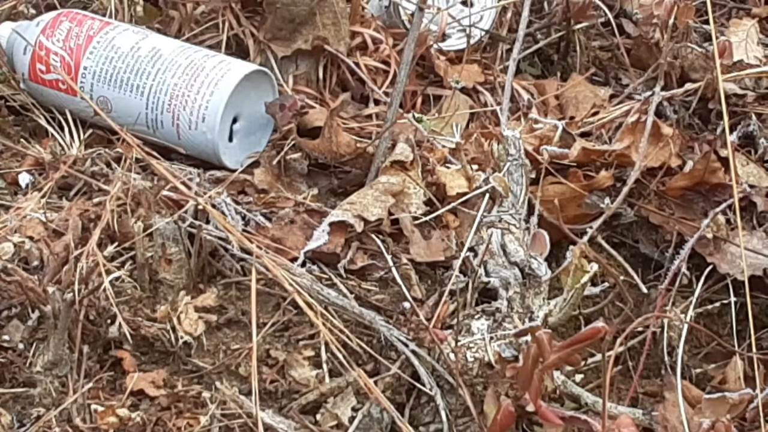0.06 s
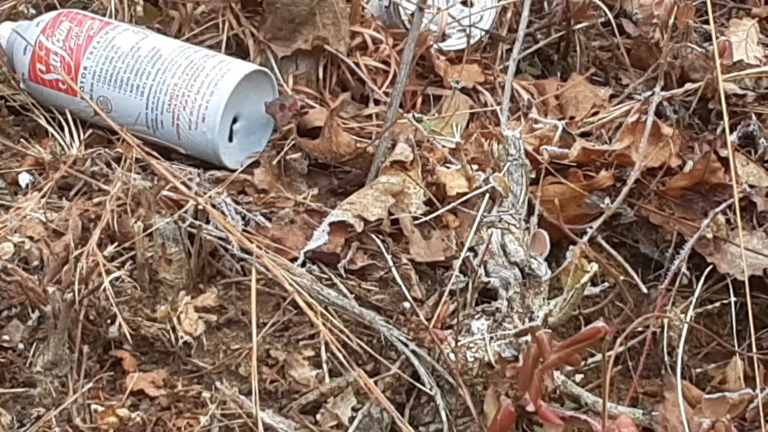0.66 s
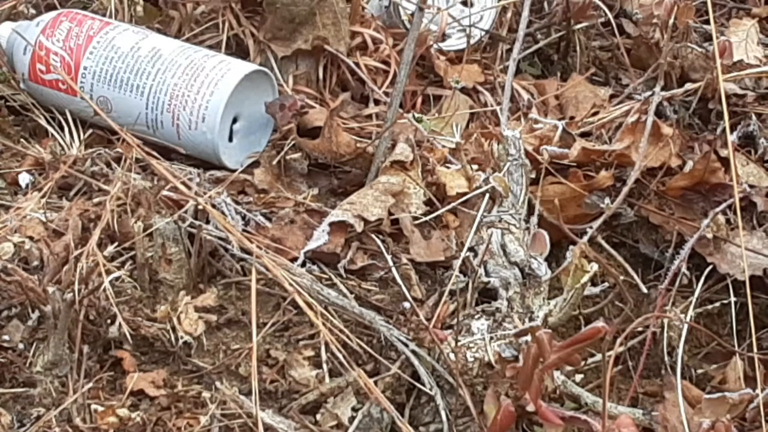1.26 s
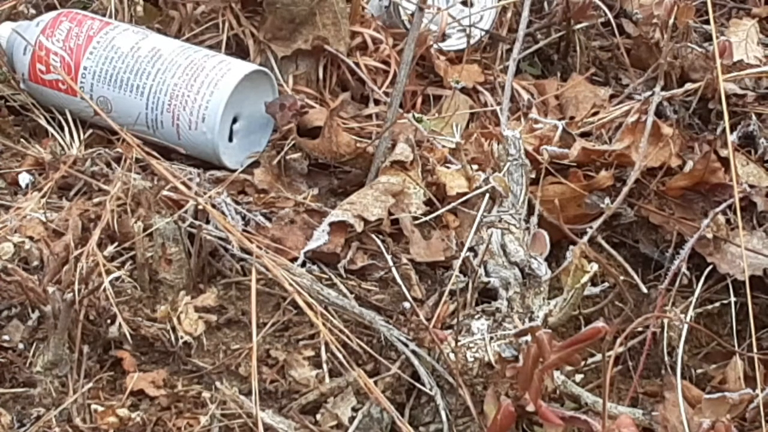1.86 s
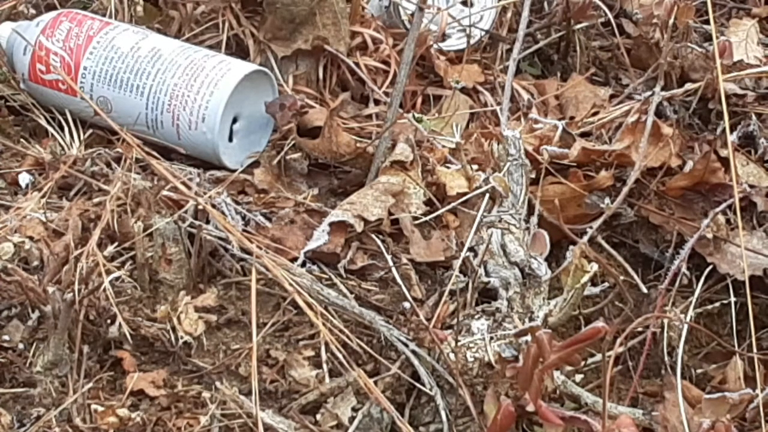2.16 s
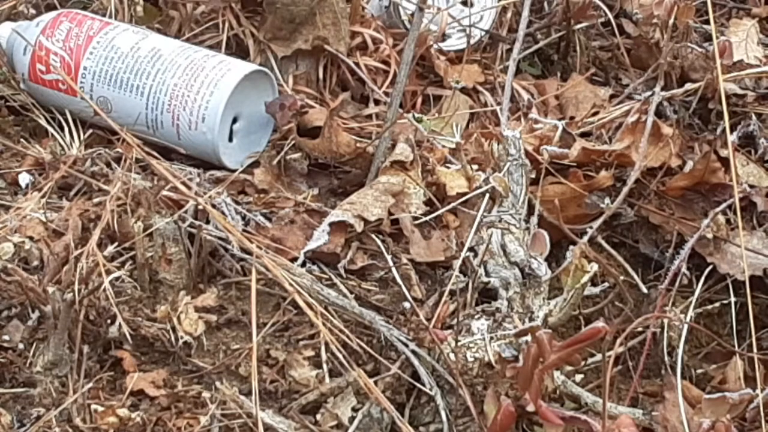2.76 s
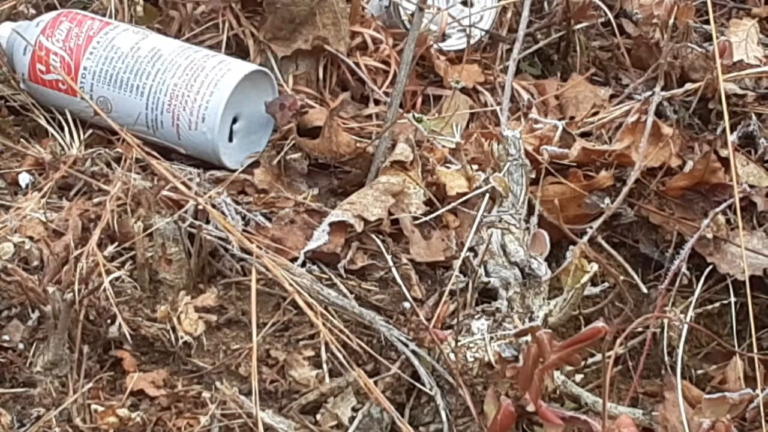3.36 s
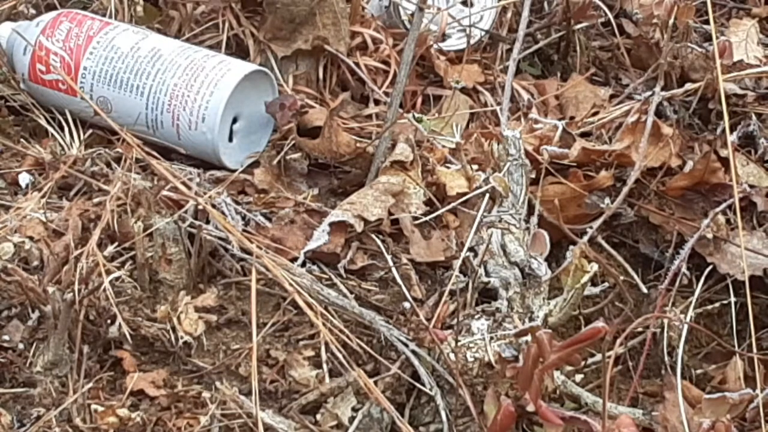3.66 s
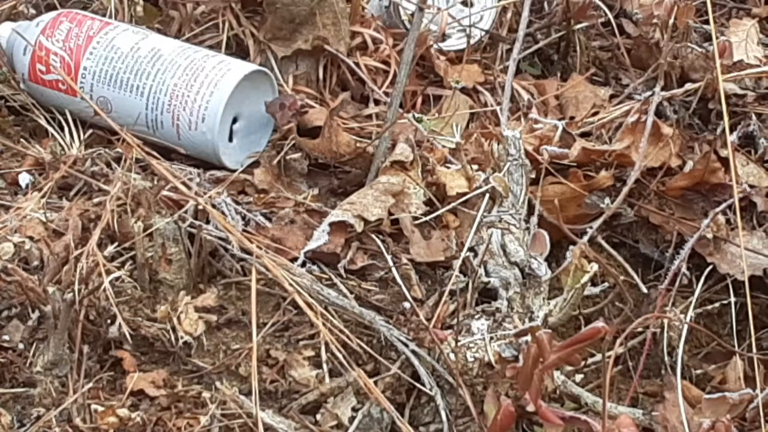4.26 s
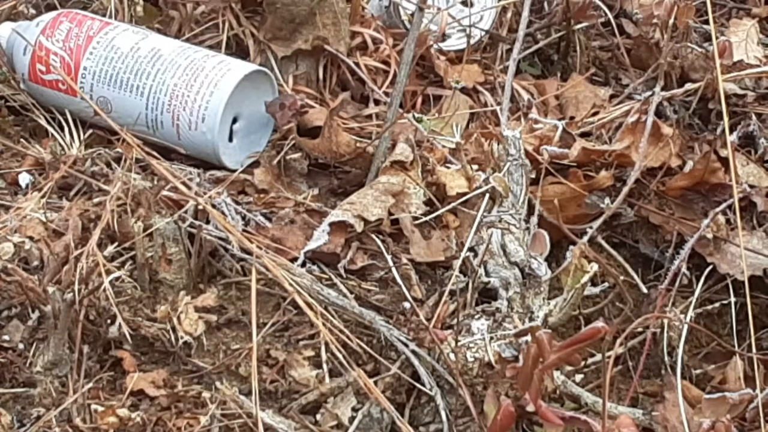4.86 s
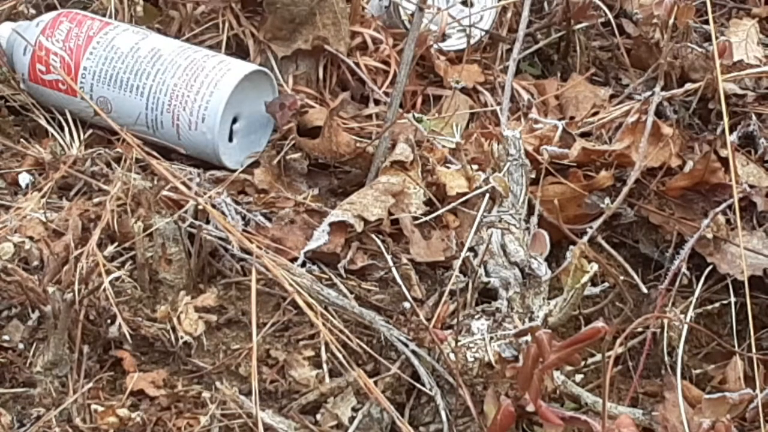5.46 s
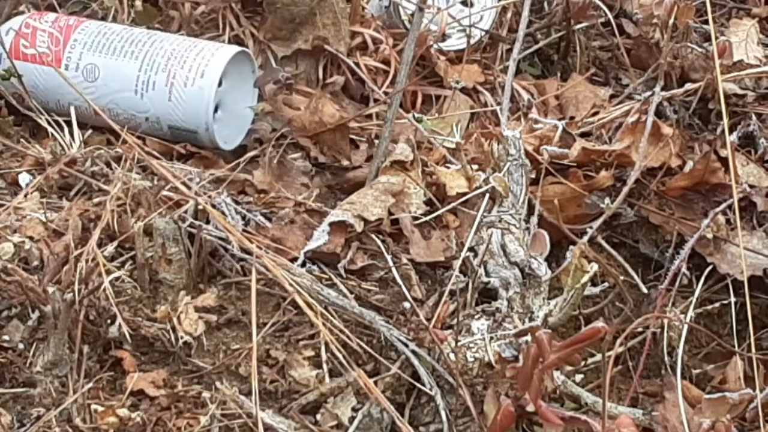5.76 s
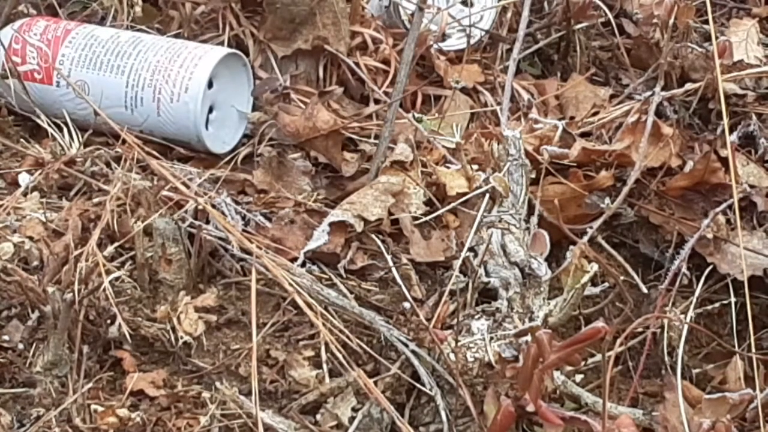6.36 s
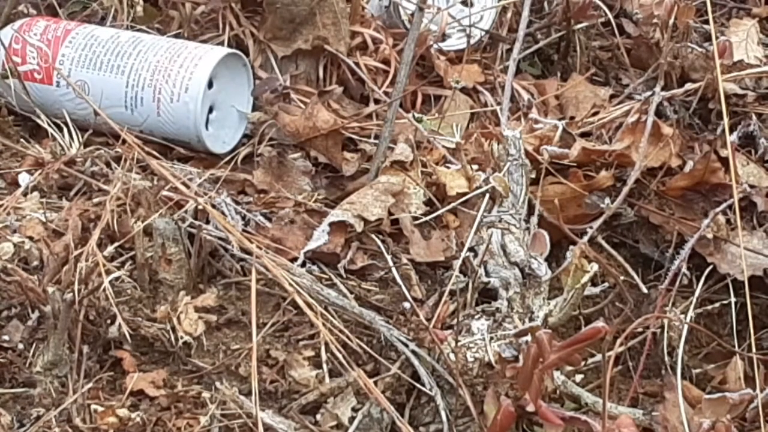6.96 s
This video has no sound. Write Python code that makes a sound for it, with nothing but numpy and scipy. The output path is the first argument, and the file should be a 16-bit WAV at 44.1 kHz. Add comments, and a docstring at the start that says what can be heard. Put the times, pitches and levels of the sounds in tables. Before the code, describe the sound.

In quiet woodland, an air rifle is readied with a few small clicks, a metal scrape and a hollow knock. Leaves shuffle softly, a dull boom rolls in from far away, and a small bird sings faintly on the left. Then the rifle cracks sharply and the pellet punches an empty can near the microphone. The can rings and rattles briefly, the trees echo the shot, and distant birds chirp.

```python
"""In quiet woodland, an air rifle is fired at an empty can lying in dry leaves near the microphone.
The rifle clicks and scrapes as it is readied, leaves shuffle, something thumps far off and birds sing.
Then the spring lets go, the muzzle cracks, and the pellet punches the can, whose thin wall rings.
The trees echo the shot, and the loud peak turns the recorder's volume down for over a second."""
import sys
import numpy as np
from scipy import signal
from scipy.fft import rfft, irfft, next_fast_len
from scipy.io import wavfile
from scipy.ndimage import minimum_filter1d

SR = 44100
rng = np.random.default_rng(int(sys.argv[2]) if len(sys.argv) > 2 else 0)


def transcribe(signal):
    """Save signal, clipped to [-1, 1], as a 16-bit WAV file at the path in sys.argv[1]."""
    frames = np.atleast_2d(signal).T
    limited = np.clip(frames, -1, 1)
    pcm = np.round(limited * 32767).astype(np.int16)
    wavfile.write(sys.argv[1], SR, pcm)


N = 318402
TIME = np.arange(N) / SR
STRIKE_S = 5.6405   # the pellet hits the can


def from_db(db):
    """Turn decibels into a number to multiply a sound by."""
    return 10 ** (np.asarray(db) / 20)


def rms_one(x):
    """Scale a sound so that its average power is one."""
    return x / np.sqrt(np.mean(x ** 2) + 1e-20)


def pan(db):
    """Left and right gains that make the left side louder by db."""
    return from_db([[db / 2], [-db / 2]])


def add(out, start, sound):
    """Mix a sound into out, beginning at start seconds."""
    i = round(start * SR)
    out[:, i:i + sound.shape[-1]] += sound[..., :N - i]


def noise(spectrum, size, alike_hz=480, lag_s=.0004):
    """Stereo noise shaped by (pitch [Hz], level [dB]) rows; the two sides are alike only in the bass."""
    f = np.fft.rfftfreq(size, 1 / SR) + 1e-3
    hz, db = np.transpose(spectrum)
    octaves_outside = np.maximum(np.log2(hz[0] / f), 0) + np.maximum(np.log2(f / hz[-1]), 0)
    gain = from_db(np.interp(np.log(f), np.log(hz), db) - 24 * octaves_outside)
    right, left_only = rfft(rng.standard_normal((2, size)))
    alike = 1 / (1 + (f / alike_hz) ** 2)
    left = np.sqrt(alike) * right * np.exp(-2j * np.pi * f * lag_s) + np.sqrt(1 - alike) * left_only
    return rms_one(irfft(gain * np.array([left, right]), size))


def burst(bands, rise_s):
    """Bands of noise start together; each drops about 60 dB in its own fade time."""
    t = TIME[:2 ** 16]
    centres = [bands[0][0] / 2] + [band[0] for band in bands] + [bands[-1][0] * 1.2]
    out = 0
    for low, (hz, db, fade_s, pan_db), high in zip(centres, bands, centres[2:]):
        shape = [(low, -20), (np.sqrt(low * hz), -3), (hz, 0), (np.sqrt(hz * high), -3), (high, -20)]
        out = out + pan(pan_db) * noise(shape, len(t)) * from_db(db) * .00089 ** (t / fade_s)
    return out * (1 - np.exp(-t / rise_s))


def woods(sound, fade_s, rise_s=.012):
    """Countless faint echoes of a sound bounce back from trunks and leaves."""
    t = TIME[:SR]
    echoes = rng.standard_normal((2, SR)) * .0016 ** (t / fade_s) * (1 - np.exp(-t / rise_s))
    return signal.fftconvolve(np.atleast_2d(sound), rms_one(echoes) / np.sqrt(SR), axes=-1)


def note(hz, taper):
    """A pure tone follows the pitches in hz; taper is the share of it spent fading in and out."""
    return np.sqrt(2) * np.sin(2 * np.pi * np.cumsum(hz) / SR) * signal.windows.tukey(len(hz), taper)


def waver(size, per_s):
    """A wobble that glides to a new random value per_s times a second."""
    targets = rng.standard_normal(SR // 10)
    return np.interp(TIME[:size] * per_s, np.arange(len(targets)), targets)


def background():
    """A distant rumble, a light breeze and a faint, even hiss."""
    # tone of the outdoor air: (pitch [Hz], relative level [dB])
    air_tone = [(15, -54), (25, -26.5), (50, -7), (75, -2), (178, -5), (215, -11.5), (359, -23.5),
                (848, -39), (3340, -44.5), (3930, -42), (5880, -46.5), (7500, -48), (9300, -55.5),
                (12200, -36), (15500, -39.5)]
    # the rumble sinks and comes back: (time [s], level [dB])
    rumble_levels = [(0, -57.5), (2.2, -58), (5.2, -62), (7.2, -57.5)]
    air = from_db(-58.5) * noise(air_tone, next_fast_len(N))[:, :N]
    low = signal.sosfiltfilt(signal.butter(2, 450, fs=SR, output="sos"), air)
    hiss = signal.sosfiltfilt(signal.butter(2, 8000, "high", fs=SR, output="sos"), air)
    breeze = air - low - hiss
    rumble = from_db(np.interp(TIME, *np.transpose(rumble_levels))) * rms_one(low)
    return pan(3.5) * (rumble + from_db(4.3) * breeze) + pan(-.4) * from_db(2) * hiss


def clicks(snap_fade_s=.026, knock_fade_s=.035):
    """Rifle parts and twigs click: each makes a bright snap and a duller knock, which the trees echo."""
    # the clicks: (time [s], snap level [dB], knock level [dB])
    events = [(.105, -57, -57), (.128, -57, -54), (.187, -55, -47), (.242, -47, -48), (.322, -34, -49),
              (.679, -75, -57), (.816, -75, -57), (.854, -69, -60), (1.088, -61, -52), (6.097, -49, -72)]
    # tone of the snap and of the knock: (pitch [Hz], relative level [dB])
    snap_tone = [(1500, -15), (3000, -11), (4800, 0), (6300, -9), (7800, 0), (10000, -18.5), (15000, -12)]
    knock_tone = [(150, -14), (330, -5.5), (460, 6.5), (600, -4), (760, 2), (1000, -15), (1500, -12.5),
                  (2050, -5), (2400, -11.5), (2900, -6), (3700, -23), (6000, -26)]
    out, t = np.zeros((2, N)), TIME[:SR // 5]
    for start, snap_db, knock_db in events:
        snap = from_db(snap_db - 60 * t / snap_fade_s) * pan(-3) * noise(snap_tone, len(t))
        knock = from_db(knock_db - 60 * t / knock_fade_s) * pan(1) * noise(knock_tone, len(t))
        click = (snap + knock) * (1 - np.exp(-t / .00047))
        add(out, start, click)
        add(out, start, from_db(-8) * woods(click, fade_s=.37))
    return out


def slide(start_s=.11, length_s=.2, rough_db=4, damping=3, fade_db_per_s=35):
    """The rifle's metal parts slide: uneven rubbing makes them ring, and the hand muffles them."""
    # tones of the parts before muffling: (pitch [Hz], width [Hz], relative level [dB])
    metal_tones = [(684, 28, 0), (1970, 110, -6), (2930, 64, -1), (4860, 37, -4), (5330, 150, -4),
                   (7360, 120, -11)]
    out, size = np.zeros((2, N)), round(length_s * SR)
    rubbing = rng.standard_normal((2, size)) * from_db(rough_db * waver(size, 90))
    metal = 0
    for hz, width, db in metal_tones:
        resonance = signal.iirpeak(hz, hz / (damping * width), fs=SR)
        metal = metal + from_db(db) * rms_one(signal.lfilter(*resonance, rubbing))
    scrape = from_db(-64 - fade_db_per_s * TIME[:size]) * rms_one(metal) * signal.windows.tukey(size, .2)
    add(out, start_s, scrape)
    add(out, start_s, from_db(-3) * woods(scrape, fade_s=.37))
    return out


def latch(start_s=.187, hz=455, db=-44.5, fade_s=.063):
    """The rifle shuts with a hollow knock from its stock, the part held against the shoulder."""
    out, t = np.zeros((2, N)), TIME[:SR // 5]
    add(out, start_s, pan(2) * from_db(db) * np.sin(2 * np.pi * hz * t) * .0011 ** (t / fade_s))
    return out


def shuffles(rise_s=.04, fade_s=.35):
    """Each soft shuffle in the leaves swells, holds and dies away."""
    # the shuffles: (time [s], length [s], level [dB])
    events = [(.63, .07, -64), (.81, .08, -64), (.97, .17, -68), (6.64, .08, -65), (7.015, .2, -58)]
    # tone of the leaves: (pitch [Hz], relative level [dB])
    leaf_tone = [(100, -6), (170, 2), (280, 1), (450, -9), (750, -12.5), (1300, -25.5), (2600, -27),
                 (6000, -36)]
    level = 0
    for start, length, db in events:
        fade_db = 60 * np.maximum(TIME - start - length, 0) / fade_s
        level = level + from_db(db - fade_db) * np.clip((TIME - start) / rise_s, 0, 1)
    return pan(3.5) * level * noise(leaf_tone, next_fast_len(N))[:, :N]


def far_thump(knock_s=1.435, boom_s=1.544, echo_s=1.725):
    """A light knock and then a dull boom roll in from far away; the boom echoes once."""
    # noise of the knock and of the boom: (pitch [Hz], level [dB], fade time [s], left over right [dB])
    knock_bands = [(182, -43, 1, 2), (340, -49.5, 0.57, 2), (800, -55, 0.37, 1), (1400, -59.5, 0.45, 1),
                   (2500, -60.5, 0.38, 0.37), (3200, -74, .25, 0)]
    boom_bands = [(90, -47.5, .7, 2), (150, -35.5, 0.62, 1.8), (202, -28, 0.67, 2), (264, -38, .5, 2),
                  (366, -36.5, 0.43, 2), (670, -46, 0.47, 2.5), (1290, -59, 0.66, 1),
                  (2370, -63.5, 0.36, 0), (4600, -75, 1.0, 0)]
    out = np.zeros((2, N))
    boom = burst(boom_bands, rise_s=.008)
    add(out, knock_s, burst(knock_bands, rise_s=.0055))
    add(out, boom_s, boom)
    add(out, echo_s, from_db(-18) * boom)
    return out


def far_birds(call_length_s=.06, call_hz=7550, call_glide_hz=850):
    """Far birds give short, gliding whistles; the fainter the bird, the more the trees blur it."""
    # one bird repeats a thin rising call: (time [s], level [dB])
    repeats = [(2.14, -88), (2.27, -88), (2.848, -88), (5.04, -91), (6.98, -80)]
    # other birds: (time [s], length [s], pitch [Hz], glide [Hz], level [dB])
    whistles = [(2.348, .07, 6650, -300, -87), (5.288, .035, 4100, 0, -65), (6.548, .028, 6250, -100, -77),
                (6.588, .035, 6200, -200, -70), (6.624, .13, 5880, -300, -73),
                (6.769, .06, 7050, 1000, -72), (7.049, .062, 2750, 100, -68), (7.185, .06, 2210, -50, -73)]
    out = np.zeros((2, N))
    calls = [(start, call_length_s, call_hz, call_glide_hz, db) for start, db in repeats]
    for start, length, pitch_hz, glide_hz, db in calls + whistles:
        t = TIME[:round(length * SR)]
        scoop = 1 + .08 * np.exp(-t / .008)   # drops onto its pitch from above
        hz = pitch_hz * scoop + glide_hz * (t / length - .5)
        call = from_db(db) * note(hz + 35 * waver(len(t), 300), taper=.53)
        echo_db = 5 - .5 * (db + 88)
        add(out, start, pan(4.2) * call)
        add(out, start, from_db(echo_db) * woods(call, fade_s=.6))
    return out


def arched_notes(start_s=3.398, every_s=.0882, count=7):
    """A bird's thin notes each rise and fall in pitch, every one lower and shorter than the last."""
    song = np.zeros((1, N))
    for k in range(count):
        length_s = np.interp(k, [0, count - 1], [.066, .032])
        top_hz = np.interp(k, [0, count - 1], [7950, 6420])
        db = np.interp(k, [0, count - 1], [-66, -65])
        depth_hz = 3200 if k else 700   # the first arch is shallow
        u = np.linspace(-1, 1, round(length_s * SR))   # position in the note, 0 at its middle
        arch_hz = top_hz - depth_hz * np.abs(u) ** 3 * (1 - .2 * u) - 220 * u
        hz = arch_hz + 90 * waver(len(u), 500)
        level = from_db(db - 4 * u * u + 2 * waver(len(u), 200))
        add(song, start_s + k * every_s, level * note(hz, taper=.12))
    return song


def buzzy_notes(start_s=3.98, every_s=.1523, length_s=.116, count=11, swing_hz=540):
    """A fast flutter in the bird's voice box makes hoarse notes, which creep up in pitch and level."""
    song = np.zeros((1, N))
    u = np.linspace(-1, 1, round(length_s * SR))   # position in the note, 0 at its middle
    for k in range(count):
        centre_hz = np.interp(k, [0, count - 1], [4150, 4480])
        db = np.interp(k, [0, count - 1], [-69.5, -66.5])
        bend_hz = 100 * u - 480 * u * u if k else -280 * u   # the first falls; the rest arch and rise
        flutter_hz = 520 * (1 - .2 * u * u) + 40 * waver(len(u), 250)
        flutter = np.sin(2 * np.pi * np.cumsum(flutter_hz) / SR)
        hz = centre_hz + bend_hz + swing_hz * flutter + 130 * waver(len(u), 1400)
        level = from_db(db + 3 * waver(len(u), 150))
        add(song, start_s + k * every_s, level * note(hz, taper=.45))
    return song


def near_bird():
    """A small bird sings on the left; close branches blur its notes and farther trunks add a tail."""
    song = arched_notes() + buzzy_notes()
    direct = np.array([song[0], np.interp(TIME - .00047, TIME, song[0])])   # reaches the right later
    branches = from_db(-6) * woods(song, fade_s=.061, rise_s=.0017)
    trunks = from_db(-5) * woods(song, fade_s=.55)
    return pan(5) * from_db(-3) * direct + pan(3.7) * (branches + trunks)[:, :N]


def rifle(spring_s=5.6195, crack_s=5.628):
    """The spring lets go, the muzzle cracks, and the crack scatters back from the trees."""
    # noise of the crack and of its echoes from near trees and the farthest ones:
    # (pitch [Hz], level [dB], fade time [s], left over right [dB])
    crack = [(180, -19, 0.14, -4.5), (500, -23.5, .05, -2), (1100, -20, .04, 5), (2200, -17, .035, 0),
             (4400, -8, .024, -5), (8000, -10, .028, -2.5), (13600, -6.5, .028, -5)]
    near_echo = [(70, -49, 1.0, 1.5), (190, -25.5, 0.89, 2), (420, -33, .8, 3.5), (800, -30, 0.68, 1),
                 (1400, -36, .68, 1), (2300, -32, .66, 1), (4000, -25, .6, -0.5), (7900, -24.5, .52, 1),
                 (13000, -23, .44, -1.5)]
    far_echo = [(300, -62, 1.6, 2), (750, -56, 1.8, 2), (1500, -56, 1.7, 2), (2400, -55, 1.3, 2),
                (3800, -53, 1.1, 2)]
    out, t = np.zeros((2, N)), TIME[:SR // 10]
    spring = noise([(200, -4), (900, -4.5), (2200, 3), (5000, -4), (9000, -5.5), (14000, 2.5)], len(t))
    add(out, spring_s, from_db(-30.5) * spring * (1 - np.exp(-t / .0013)) * 1e-3 ** (t / .05))
    add(out, crack_s, burst(crack, rise_s=.0003))
    add(out, STRIKE_S, burst(near_echo, rise_s=.059))
    add(out, STRIKE_S, burst(far_echo, rise_s=.1))
    return out


def can_ring(fade_s=.23, spread=.6):
    """The struck can rings at its own natural pitches; dents split each into three close tones."""
    # the can's main tones and its low, hollow one: (pitch [Hz], width [Hz], relative level [dB])
    main_tones = [(710, 64, -5), (1160, 21, -4), (1879, 25, 1), (2060, 38, -4.5), (2450, 28, -4),
                  (2960, 50, -13.5), (3385, 29, -2), (3610, 85, -4), (3950, 27, -11), (4220, 20, -11.5),
                  (4430, 34, -10), (4930, 21, -10.5), (5210, 53, -10.5), (5820, 42, -12), (7820, 250, -7),
                  (9120, 130, -18), (10100, 83, -17.5), (10800, 39, -15.5), (11000, 40, -13),
                  (11300, 37, -14), (11700, 35, -12.5), (12600, 120, -14.5)]
    hollow_tone = (810, 40, -12)
    t = TIME[:SR // 2]
    ring = 0
    for hz, width, db in main_tones + [hollow_tone]:
        for split, split_db in [(0, 0), (-spread, -8), (spread, -8)]:
            # left and right hear different sides of the can
            phase = rng.uniform(0, 2 * np.pi) + rng.normal(0, .7, (2, 1))
            pitch = hz + split * width * rng.uniform(.5, 1.5)
            ring = ring + from_db(db + split_db - 19) * np.sin(2 * np.pi * pitch * t + phase)
    return ring * pan(4) * 1e-3 ** (t / fade_s) * (1 - np.exp(-t / .004))


def can_buzz(count=200, db=-13, fade_s=.18, uneven_db=4):
    """The can's thin wall buzzes with many weaker tones, struck unevenly; the high ones die sooner."""
    # strength of the wall's tones: (pitch [Hz], relative level [dB])
    wall = [(1000, -9), (2200, -1.5), (4000, 1), (6500, -4), (7800, 2.5), (9500, -7), (11500, 3),
            (15500, 0.5)]
    t = TIME[:SR // 3]
    out = 0
    for hz in np.linspace(wall[0][0], wall[-1][0], count) + rng.normal(0, 30, count):
        strength = from_db(np.interp(hz, *np.transpose(wall)) + uneven_db * rng.standard_normal((2, 1)))
        phase = rng.uniform(0, 2 * np.pi, (2, 1))
        fade = 1e-3 ** (t / fade_s * (hz / 8000) ** .16)
        out = out + strength * np.sin(2 * np.pi * hz * t + phase) * fade
    return from_db(db) * out / np.sqrt(count) * (1 - np.exp(-t / .0022))


def can(landing_s=5.7418, rattle_s=5.812):
    """The pellet punches through; the can buzzes, rings, drops into the leaves and rattles to rest."""
    # noise of the hit, landing and rattle: (pitch [Hz], level [dB], fade time [s], left over right [dB])
    punch = [(180, -12, .045, 10.5), (370, -13, .035, 8), (520, -21, .03, 4), (850, -15, .035, 5),
             (1530, -10, .04, 8), (2530, -9, .04, 7.5), (4400, -9, .035, 2.5), (8200, -17, 0.033, 0.5),
             (13000, -9, .045, -3)]
    landing = [(1100, -42, .03, 0), (3600, -33, .03, -1), (6500, -28, .02, 0), (7700, -16, 0.023, 0),
               (9300, -29, .02, 0), (13000, -19.5, .022, -1)]
    rattle = [(2720, -50, .15, -1), (3570, -31, .17, 4), (4600, -44, .15, 1), (7900, -35, 0.2, 0)]
    # the stiff rims ring longest, faint and unsteady: (pitch [Hz], level [dB], fade time [s])
    rim_tones = [(715, -50, 1.1), (1156, -48, .85), (1882, -58, 1.85)]
    out = np.zeros((2, N))
    ring = can_ring()
    add(out, STRIKE_S, burst(punch, rise_s=.0006))
    add(out, STRIKE_S, can_buzz())
    add(out, STRIKE_S, ring)
    add(out, STRIKE_S, from_db(-12) * woods(ring, fade_s=.66))
    for hz, db, fade_s in rim_tones:
        wobble = .55 + .65 * waver(N, 35)
        rim = wobble * np.sin(2 * np.pi * hz * TIME) * 1e-3 ** (TIME / fade_s)
        add(out, STRIKE_S, pan(3) * from_db(db) * rim)
    add(out, landing_s, burst(landing, rise_s=.00064))
    add(out, rattle_s, burst(rattle, rise_s=.012))
    return out


def puff(left_db=-5, right_db=-27, first_hz=190, last_hz=50, drop_s=.0056, fade_s=.11):
    """A puff of air from the hit shoves the microphone's nearer side: a short, falling thud."""
    out, t = np.zeros((2, N)), TIME[:SR // 4]
    hz = last_hz + (first_hz - last_hz) * np.exp(-t / drop_s)
    thud = np.sin(2 * np.pi * np.cumsum(hz) / SR) * 1e-3 ** (t / fade_s)
    add(out, STRIKE_S, from_db([[left_db], [right_db]]) * thud)
    return out


def scene():
    """All the sounds as they reach the left and right sides of the microphone."""
    handling = clicks() + latch() + slide() + shuffles()
    return rifle() + can() + puff() + handling + near_bird() + far_birds() + far_thump() + background()


def record(dry, threshold_db=-20, depth_db=10, hold_s=1.21, release_db_per_s=24, cutoff_hz=15700):
    """Loud peaks turn the volume down; it waits, then creeps back. The highest treble is cut off."""
    level_db = 20 * np.log10(np.abs(dry).max(axis=0) + 1e-9)
    over_db = np.clip(level_db - threshold_db, 0, depth_db)
    size = int(hold_s * SR) // 2 * 2 + 1
    held_db = -minimum_filter1d(-over_db, size, origin=size // 2, mode="constant")   # biggest recent peak
    recovery_db = release_db_per_s * TIME
    turned_down_db = np.maximum.accumulate(held_db + recovery_db) - recovery_db
    rounded = .8 * np.tanh(dry * from_db(-turned_down_db) / .8)   # softens the remaining peaks
    return signal.sosfilt(signal.ellip(10, .2, 70, cutoff_hz, fs=SR, output="sos"), rounded)


dry = scene()
out = record(dry)
transcribe(out)
```